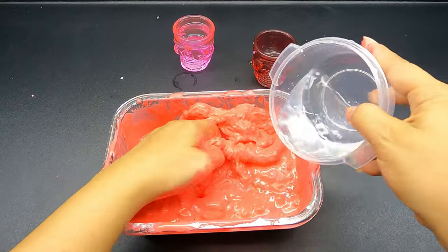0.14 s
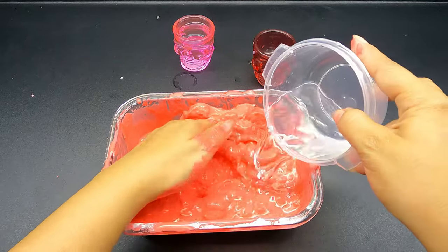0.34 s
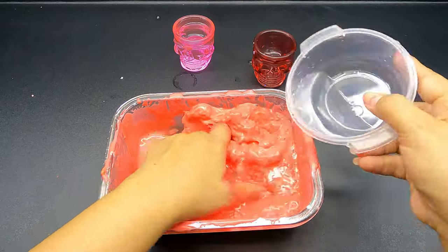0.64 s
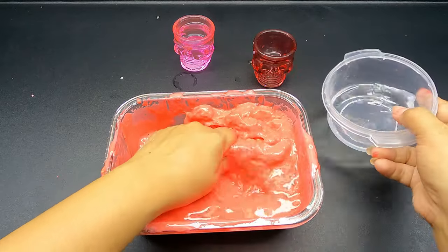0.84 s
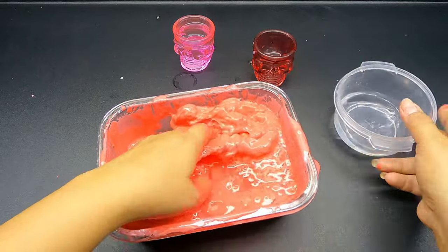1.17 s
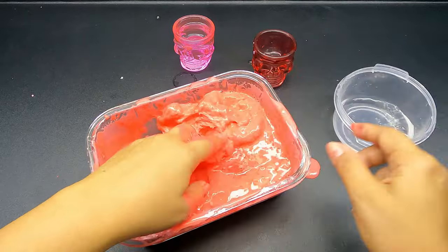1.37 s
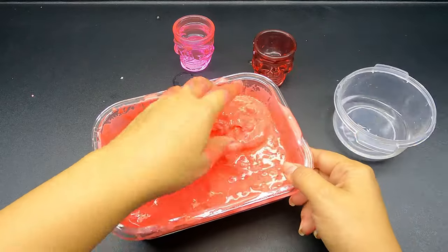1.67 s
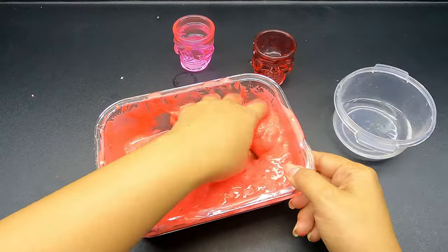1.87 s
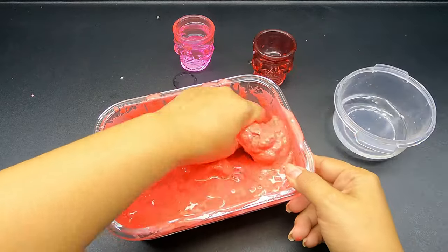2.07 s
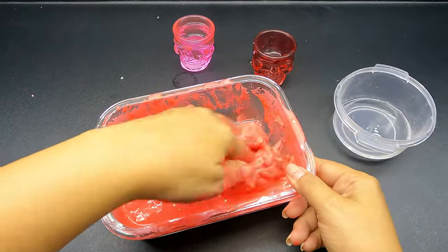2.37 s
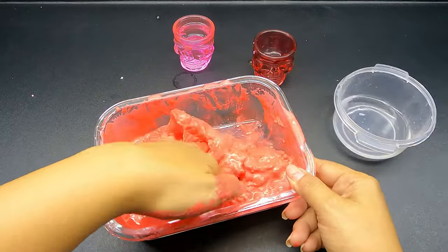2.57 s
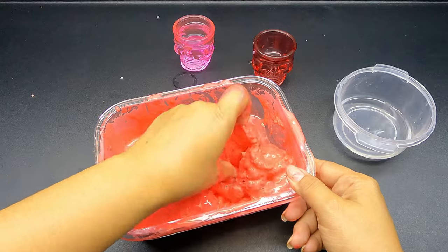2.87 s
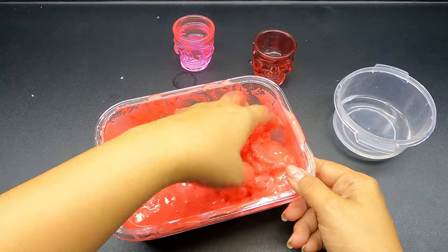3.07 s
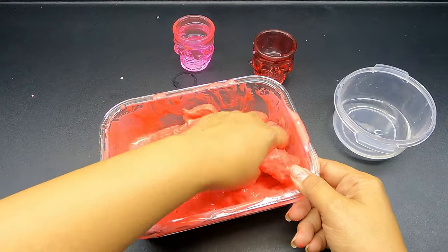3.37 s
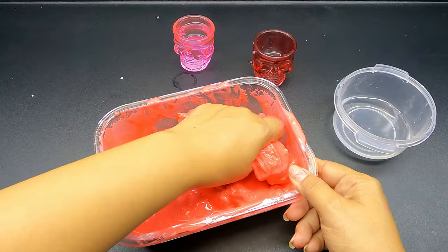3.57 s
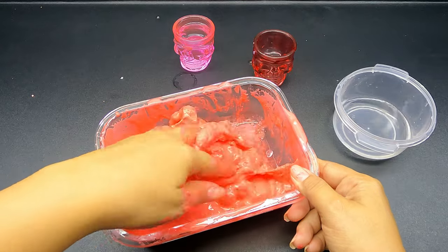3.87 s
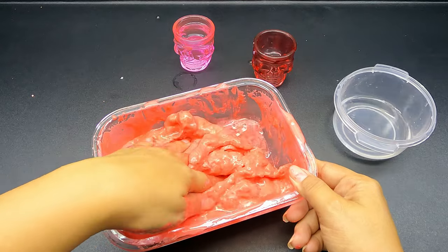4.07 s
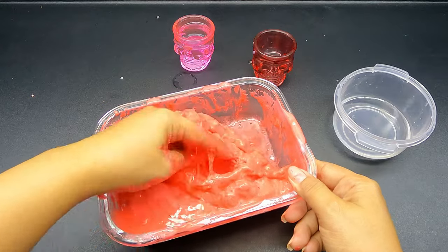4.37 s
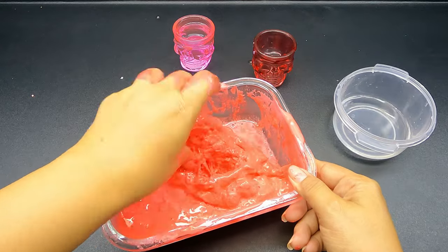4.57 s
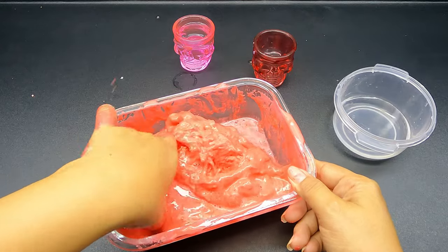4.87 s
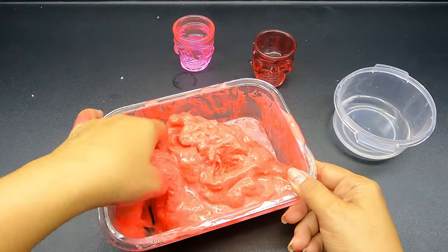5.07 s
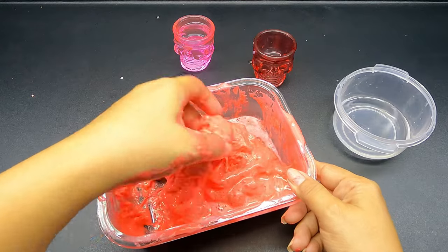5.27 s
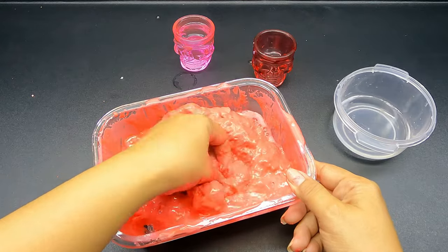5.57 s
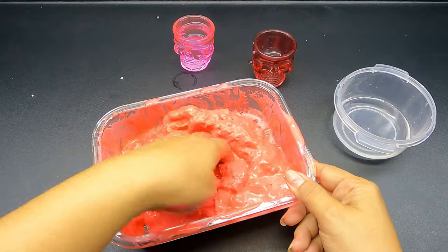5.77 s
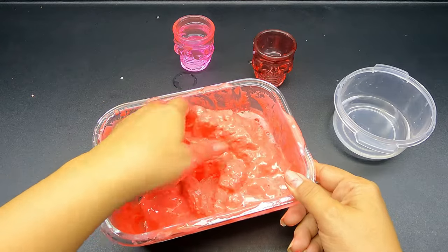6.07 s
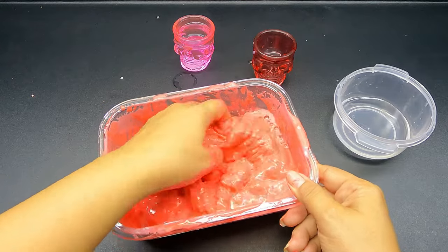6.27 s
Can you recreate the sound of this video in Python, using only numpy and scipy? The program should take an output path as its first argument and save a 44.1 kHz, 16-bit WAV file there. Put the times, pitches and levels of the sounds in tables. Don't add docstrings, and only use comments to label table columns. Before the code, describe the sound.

Close-up slime squeezing: crisp snapping bubbles in irregular clusters over faint wet crackle, with low hollow thuds as the light tub knocks the tabletop.

```python
import sys
import numpy as np
from scipy import signal
from scipy.fft import rfft, irfft, next_fast_len
from scipy.io import wavfile
from scipy.ndimage import uniform_filter1d, map_coordinates

SR = 44100
rng = np.random.default_rng(int(sys.argv[2]) if len(sys.argv) > 2 else 0)


def nominal_scale(level):
    x = np.asarray(level, float) / 20
    return 10 ** x


def output_pcm(signal):
    pcm = np.clip(np.atleast_2d(signal).T, -1, 1) * 32767
    wavfile.write(sys.argv[1], SR, np.round(pcm).astype(np.int16))


N = 283563

# time in s, cavity level in dB, snap level in dB,
# snap centre in Hz.
PAIRS = [(0.1525, -39, -42, 4030), (0.944, -40, -44.5, 4840), (1.0447, -38, -44, 4100),
         (1.975, -47, -43.5, 5470), (2.6322, -46, -44.5, 3660), (2.699, -40, -41.5, 3700),
         (2.777, -42, -41, 4250), (3.076, -47.5, -39.5, 4200), (3.168, -41.5, -44, 6100),
         (3.324, -49, -41, 4800), (3.5005, -44, -42, 5900), (3.544, -37.5, -50, 4920),
         (3.551, -44, -35.5, 5600), (4.0137, -46, -36.5, 3970), (4.404, -41.5, -46.5, 2860),
         (4.456, -52, -31, 3300), (4.611, -38.5, -31.5, 6800), (5.1963, -51, -49.5, 5300),
         (5.5496, -55, -39.5, 2780), (5.627, -47, -45, 5740), (5.7429, -51, -42, 7000),
         (6.343, -44, -41, 7400), (1.633, -63, -39, 5260), (2.67, -47, -51, 6500),
         (2.865, -47, -47.5, 3350), (4.315, -60, -50, 7000), (4.345, -56, -48, 5500),
         (5.464, -58, -51, 3240), (3.399, -57, -38, 5200)]
# frequency in Hz, level in dB, t60 in s.
LEG_MODES = [(47.34, -3, 0.76)]
TABLE_TOP_MODES = [(101.2, -16, 0.78), (131, 0, 0.17), (144.5, -4.5, 0.68), (336.3, -7.5, 0.17),
                   (403.3, -10.5, 0.24)]
DISH_BASE_MODES = [(183, -0.5, 0.096), (214.9, 1.5, 0.35), (242.4, 2, 0.19)]
DISH_WALL_MODES = [(486, 29.5, 0.034), (584, 13, 0.21), (688, 8.5, 0.33), (848, 7.5, 0.22), (928, 2.5, 0.2),
                   (993, 1, 0.15), (1013, 12, 0.13), (1140, 7, 0.34), (1190, 4.5, 0.24), (1370, -5, 0.12),
                   (1520, -5, 0.083), (1720, -3, 0.15)]


def pops():
    # frequency in Hz, level in dB.
    mic_tone = [(300, 10), (750, 2), (1100, 5), (7500, -3), (10200, -8), (12000, -8.5), (16000, -33)]

    def tone_and_echo(hz):
        echo = 0.18 * np.exp(-2j * np.pi * hz * 0.0034)
        return nominal_scale(along(mic_tone, hz)) * (1 + echo)

    pop = filtered(air_pockets() + film_snaps(), tone_and_echo)
    walls = ring(DISH_WALL_MODES, np.arange(SR // 4) / SR, 0)
    walls = walls / np.abs(rfft(walls)).max()
    return pop + nominal_scale(-18) * signal.fftconvolve(pop.mean(0), walls)[:N]


def air_pockets():
    # time of the middle in s, peak in dB, cavity in Hz, length in ms.
    loud_pockets = [(0.9185, -34.5, 1960, 1.17), (0.9704, -31, 1800, 2), (0.9792, -24, 1640, 1.7),
                    (0.9972, -29.5, 1720.0, 1.4), (1.17, -25, 1770, 0.68), (1.2175, -26, 1300, 1.6),
                    (1.2953, -33, 1590, 3.1), (1.365, -33, 1600.0, 2.1), (1.3883, -20, 1240, 2.7),
                    (1.4097, -31, 1760, 2.76), (1.433, -27, 1400, 1.9), (1.5231, -28, 1720, 0.92),
                    (2.141, -29.5, 1620.0, 1.63), (2.1803, -32.0, 1360, 1.4), (2.1897, -14.5, 1660, 1.18),
                    (2.1962, -41, 1520.0, 0.92), (2.3336, -14.5, 1040, 2.74), (2.3378, -14.5, 990, 3.1),
                    (2.3444, -25, 1060, 2.9), (2.35, -25.0, 1100, 2.6), (2.3624, -26, 1210, 3),
                    (2.371, -26.5, 1170, 3.6), (2.5458, -29.5, 1874, 1.02), (2.9398, -33.5, 1420, 1.5),
                    (3.4142, -27.5, 1710, 2.3), (3.4205, -32, 1540, 5.5), (3.5021, -28.5, 1610, 3.6),
                    (3.6, -27.5, 1550, 3.3), (3.6057, -34, 1510, 4.2), (3.613, -26.5, 1600, 3),
                    (3.764, -41, 1520, 1.2), (3.7958, -20.5, 1770, 1.26), (3.7993, -26, 1220, 2.44),
                    (4.1294, -28, 2100, 0.98), (4.4574, -22, 1770.0, 0.35), (4.4971, -18, 1800, 0.97),
                    (4.4995, -22.5, 1270, 1.14), (4.937, -33.5, 1140.0, 1.7), (5.2305, -25.5, 1200, 2.2),
                    (5.2348, -21, 1010, 2.14), (5.242, -27, 1060, 1.35), (5.6525, -35, 1480, 2.24),
                    (5.808, -28, 1500.0, 2.3), (5.8941, -26, 1370.0, 2.26), (5.937, -24.5, 1900.0, 1.2),
                    (5.94, -21, 1580, 0.83), (5.9715, -22, 1550.0, 0.95), (5.976, -17.5, 1400, 1.24),
                    (5.9782, -19, 1190, 1.47), (5.99, -40, 1570.0, 0.6)]
    # time in s, peak in dB, cavity in Hz.
    small_pockets = [(0.1815, -38, 1620), (0.822, -34.5, 1630), (0.951, -34, 1460.0), (0.9731, -34, 1550),
                     (0.9775, -40.0, 1780.0), (0.9943, -40.0, 1480), (1.0246, -37, 2090.0),
                     (1.0348, -39, 1770), (1.176, -35, 1720.0), (1.1921, -34, 1700), (1.2246, -45, 1280.0),
                     (1.292, -33, 1310.0), (1.298, -39, 1740.0), (1.3102, -45, 1440),
                     (1.3307, -35.0, 1840.0), (1.3347, -35, 1520.0), (1.337, -33, 1840.0),
                     (1.3506, -30, 1360), (1.3963, -36, 1310), (1.398, -32, 1740), (1.413, -30, 1800),
                     (1.4172, -39, 1530.0), (1.4235, -37, 1610), (1.4296, -42, 1340.0), (1.5613, -48, 1820),
                     (2.1215, -37, 1650.0), (2.1835, -32, 1190.0), (2.315, -38, 1640), (2.5242, -38, 1490.0),
                     (2.5725, -36.5, 1340), (2.9326, -38.5, 1540.0), (3.416, -28, 1900), (3.4906, -35, 1870),
                     (3.508, -35, 1610), (3.5214, -42, 1830.0), (3.5387, -36, 1920.0), (3.546, -44, 1730.0),
                     (3.5529, -36, 1820.0), (3.5598, -37, 1580.0), (3.5646, -33, 1690.0),
                     (3.6179, -45, 1570.0), (3.6235, -37, 1530), (3.8046, -40, 1860), (3.8645, -34, 1350),
                     (4.028, -35, 1290), (4.4443, -31, 1500.0), (4.4482, -32.5, 1300), (4.467, -31, 2320),
                     (4.4938, -42, 1760), (4.503, -31.5, 1250), (4.546, -37, 2100), (4.901, -37, 1960),
                     (4.941, -39, 1430), (4.9437, -48, 1050), (5.8906, -35, 1800.0), (5.8974, -39, 1630.0),
                     (5.943, -35, 1610.0), (5.948, -41, 1570.0), (6.3058, -36.5, 1390),
                     (0.198, -45, 1520), (0.224, -39, 1820), (0.402, -55.5, 1390), (0.5285, -52.5, 1950),
                     (0.7414, -39.5, 1400), (0.9063, -39, 1640.0), (0.9207, -43, 1590.0),
                     (1.109, -40.5, 1630.0), (1.1226, -39, 1500.0), (1.5278, -49, 1460),
                     (1.564, -40.5, 1510.0), (1.9842, -37, 1890), (2.2543, -37, 1390), (2.4658, -41, 1450),
                     (2.5618, -41, 1430.0), (2.637, -40, 1320), (2.9229, -34, 1320), (3.083, -37, 1320),
                     (3.3685, -38.5, 1650), (3.7895, -34, 1450), (3.891, -38, 1970), (4.0777, -40, 1260.0),
                     (4.082, -42, 1420), (4.1288, -37, 1520), (4.461, -36, 1340), (4.6178, -43, 1350),
                     (4.8277, -45.5, 1180), (4.8305, -53, 2150), (4.864, -41, 1280), (4.866, -48, 2140),
                     (5.5541, -40, 1230), (6.3591, -35.5, 1750),
                     (1.792, -46.5, 1200),
        (3.403, -41, 1550),
        (3.444, -39, 1150),
        (3.584, -43, 1300),
        (5.837, -54, 1400),
        (5.863, -43, 1360),
        (2.267, -48, 1500),
    ]
    # start in s, level in dB, centre in Hz, length in ms.
    leaks = [
        (5.655, -65, 5600, 50),
        (5.812, -55, 7400, 63),
        (5.978, -48.5, 4630, 71),
    ]
    small_ms, paired_ms, paired_hz, pitch_scatter = 1.514, 2.58, 1575, 0.1
    sputter_db = -16.5

    pockets = [tuple(row) for row in loud_pockets]
    pockets += [(*row, small_ms) for row in small_pockets]
    sputter = [(s - ms / 2000, db + sputter_db, hz, 2 * ms) for s, db, hz, ms in pockets]
    pitch = paired_hz * np.exp(pitch_scatter * rng.standard_normal(len(PAIRS)))
    paired = [(s, db, hz, paired_ms) for (s, db, _, _), hz in zip(PAIRS, pitch)]

    tones = bubbles(pockets, swell=4.4, fade=3.94, glide=0.015, lean_db=0.95)
    wet = bursts(sputter + paired, q=1.19, broad_db=-27.5, grain_db=-0.5, rise=0.093, tail=13.5, sag_db=4.0)
    seep = bursts(leaks, q=4.2, broad_db=-10, grain_db=-1.0, rise=0.0454, tail=19, sag_db=1.5, size=8192)
    return tones + wet + seep


def film_snaps():
    # time in s, level in dB, centre in Hz, length in ms.
    loud_snaps = [(0.1701, -31.5, 7500, 1.5), (0.1796, -25, 7600, 0.81), (0.1978, -31.5, 4770, 1.37),
                  (0.2375, -31, 4670, 1.83), (0.8156, -28.5, 7850, 0.97), (1.1913, -30.5, 5240, 2.4),
                  (1.2906, -35, 3640, 5.5), (1.3632, -25.5, 3800, 1.65), (1.3859, -23, 6140, 3.8),
                  (1.4076, -30.5, 3080, 4.2), (1.5205, -27.5, 3600, 1.28), (1.5595, -25.5, 8050, 3.2),
                  (2.3841, -33.5, 7860, 5.3), (2.9386, -24.5, 6260, 1.9), (3.6011, -31.5, 7460, 7.2),
                  (3.7632, -25, 7240, 2.8), (3.7956, -21.5, 5500, 2.06), (3.8869, -36.5, 7760, 7.5),
                  (4.1266, -25.5, 4650, 1.8), (4.4427, -31.5, 7100, 4), (4.4968, -24.5, 3030, 1.74),
                  (4.6025, -36, 5620, 0.73), (5.6514, -30, 7000, 1.56), (5.8073, -36, 3500, 2.6),
                  (5.8934, -21.5, 10000, 3.3), (5.939, -17, 4550, 4.2), (5.9714, -16.5, 3840, 0.97),
                  (5.9747, -12.5, 4370, 0.65), (5.9909, -23, 3500, 1.38)]
    # time in s, level in dB, centre in Hz.
    faint_snaps = [(0.0515, -47, 3950), (0.1238, -41.5, 9100), (0.555, -50, 5950), (0.5883, -47.5, 6840),
                   (0.716, -45, 7900), (0.771, -44.5, 5500), (0.9686, -33.5, 3640), (1.0336, -41, 5430),
                   (1.1438, -43.5, 6640), (1.1693, -36, 3300), (1.2527, -37.5, 5800), (1.331, -38, 3100),
                   (1.35, -34, 4120), (2.3383, -31.5, 7500), (2.396, -34, 8600), (3.4696, -39, 3300),
                   (3.519, -34, 6700), (3.5384, -42, 5800), (3.757, -34, 7360), (4.0018, -40.5, 3930),
                   (4.067, -44.5, 6500), (4.546, -35, 6800), (5.0897, -44.5, 5430), (5.3, -40.5, 5500),
                   (5.3118, -38.5, 5560), (5.5, -45.5, 4200), (5.559, -39.5, 5300), (5.8826, -37, 9500)]
    ticks = [(0.1331, -45, 8200), (0.6543, -42, 5760), (0.6994, -50, 7410.0), (0.7114, -54.0, 6070.0),
             (0.7388, -38, 6900), (0.793, -37.5, 4540.0), (0.907, -45, 5090.0), (0.9648, -36.5, 5740),
             (1.0003, -47, 3340.0), (1.1218, -43, 5070.0), (1.1344, -49, 7080.0), (1.2159, -41.0, 4630.0),
             (1.913, -49, 6030), (1.969, -41, 5620.0), (2.0867, -51, 4690.0), (2.1892, -39, 8000),
             (2.441, -37, 6700), (2.578, -46, 5220.0), (2.7087, -44, 4860), (3.0167, -39, 7250),
             (3.2815, -51, 6790.0), (3.3513, -45, 5350.0), (3.3663, -44, 4960.0), (3.5067, -35, 6040.0),
             (3.5453, -41, 5420.0), (3.9788, -42, 5820.0), (4.0812, -41, 5380.0), (4.0872, -43, 4800.0),
             (4.3064, -52, 5690.0), (4.3194, -51, 5790.0), (4.5449, -36, 6500.0), (4.602, -38, 5570.0),
             (4.8617, -43.5, 7200), (5.305, -37, 3850), (5.5703, -46, 5180.0), (6.3411, -32, 7350)]
    # time in s, level in dB, pitch in Hz, length in ms.
    tuned_snaps = [
        (2.1893, -25, 4180, 1.3),
        (5.8073, -26, 7400, 2.3),
        (5.6514, -29, 5700, 1.4),
        (5.9909, -21, 5160, 1.54),
        (3.812, -40, 4750, 12),
    ]
    skin_ms, tick_ms = 2.493, 0.71

    paired = [(s, db, hz) for s, _, db, hz in PAIRS]
    skins = [(*row, skin_ms) for row in faint_snaps + paired]
    skins += [(*row, tick_ms) for row in ticks]
    tearing = bursts(loud_snaps + skins, q=1.1, broad_db=-8.0, grain_db=3, rise=0.85, tail=13.9, bend=0.87)
    ringing = bursts(tuned_snaps, q=3.3, broad_db=-23.5, grain_db=1.0, rise=0.295, tail=12.5)
    return tearing + ringing


def bubbles(table, swell, fade, glide, lean_db):
    s, db, hz, ms = (c[:, None] for c in np.transpose(table))
    lead = 256
    t = (np.arange(1024) - lead) / SR
    u = t * 1000 / ms
    luck = rng.standard_normal((len(s), 2))
    shape = 2 / (np.exp(np.minimum(-swell * u, 50)) + np.exp(np.minimum(fade * u, 50)))
    opening = 1 + glide * np.tanh(u / 2) / 2
    rows = nominal_scale(db) * shape * np.sin(2 * np.pi * hz * t * opening + np.pi * luck[:, :1])
    lean = nominal_scale(lean_db * luck[:, 1:])
    start = s[:, 0] - lead / SR
    return np.array([placed(start, rows * lean), placed(start, rows / lean)])


def bursts(table, q, broad_db, grain_db, rise, tail, sag_db=0, bend=2, size=1024):
    s, db, hz, ms = (c[:, None] for c in np.transpose(table))
    u = np.arange(size) / SR * 1000 / ms
    grains = rng.standard_normal((len(s), size)) * nominal_scale(grain_db * rng.standard_normal((len(s), size)))
    luck = rng.standard_normal((len(s), 2))
    shape = np.minimum(u / rise, 1) ** bend
    shape = shape * nominal_scale(-tail * np.maximum(u - 0.9, 0)) * nominal_scale(-sag_db * u)

    f = np.fft.rfftfreq(2 * size, 1 / SR)
    width = hz / (q * nominal_scale(1.5 * luck[:, :1]))
    resonance = 1j * f * width / (hz ** 2 - f ** 2 + 1j * f * width)
    bass_cut = (1j * f / (900 + 1j * f)) ** 2
    mouth = (resonance ** 2 + nominal_scale(broad_db)) * bass_cut
    rows = irfft(rfft(grains * shape, 2 * size) * mouth)[:, :size]
    rows *= nominal_scale(db) * np.sqrt(ms * SR / 1000) / np.linalg.norm(rows, axis=1, keepdims=True)

    lean = nominal_scale(1.1 * luck[:, 1:])
    start = (s - 0.5 * rise * ms / 1000)[:, 0]
    return np.array([placed(start, rows * lean), placed(start, rows / lean)])


def rim_flicks():
    # time in s, level in dB.
    flicks = [
        (2.334, -23.5),
        (5.232, -30),
        (5.9745, -25.5),
    ]
    # frequency in Hz, level in dB, t60 in s.
    rim_modes = [(685, -2, 0.28), (930, -2.5, 0.26), (1020, -5, 0.26), (1188, 2, 0.29)]
    t = np.arange(SR // 2) / SR
    rows = [nominal_scale(db) * ring(rim_modes, t, 1.5) for _, db in flicks]
    return placed(np.array(flicks)[:, 0], np.array(rows))


def slime():
    # start in s, length in s, squelch in dB, fizz in dB.
    squeezes = [(0.163, 0.094, -55.5, -57), (0.538, 0.045, -61.5, -71.5), (0.735, 0.19, -56.5, -59),
                (0.915, 0.15, -53, -69), (1.177, 0.26, -41.5, -52.5), (1.522, 0.098, -55, -49),
                (1.917, 0.24, -56.5, -62.5), (2.265, 0.14, -52.5, -53.5), (2.355, 0.12, -56, -59.5),
                (2.537, 0.072, -51.5, -66), (2.858, 0.24, -55, -56), (3.387, 0.27, -51, -57),
                (3.743, 0.16, -57, -50), (3.988, 0.25, -56, -64), (4.397, 0.27, -57, -57),
                (4.87, 0.098, -59, -61.5), (5.201, 0.14, -51.5, -62), (5.503, 0.12, -60.5, -63),
                (5.807, 0.24, -58.5, -63), (5.953, 0.081, -74, -54), (6.275, 0.3, -51.5, -63)]
    # frequency in Hz, level in dB per Hz.
    squelch_tone = [(500, 1.5), (850, -22.5), (1050, 6), (1300, 3.5), (1700, -22), (2300, -3), (3300, -14),
                    (5000, -48)]
    fizz_tone = [(1500, 10.5), (3000, 3.5), (4800, 10.5), (7500, 6.5), (9500, 3), (10500, -5.5),
                 (12500, 1.5), (16400, -44)]
    hiss_tone = [(290, -39), (500, -10), (853, -9.5), (1210, -16), (3470, -22), (5190, -14.5),
                 (7560, -13.5), (11300, -26), (15800, -39)]
    rest_squelch_db, rest_fizz_db, hiss_db = -67.5, -76.5, -75
    ease_db_per_s = 239

    start, length, squelch_db, fizz_db = np.transpose(squeezes)
    squelch = crackle(squelch_tone, centre_hz=1500, count=2600, cycles=4.45, size_db=4.0,
                      scatter=0.246, smooth=0.91, patchy_db=4.0)
    squelch = squelch * nominal_scale(2.1 * wobble(30))
    squelch = squelch * effort(start, length, squelch_db, rest_squelch_db, ease_db_per_s)
    fizz = crackle(fizz_tone, centre_hz=5500, count=5000, cycles=2.05, size_db=5.0,
                   scatter=0.482, smooth=0.89, patchy_db=3.0, size=128)
    fizz = fizz * nominal_scale(3.2 * wobble(43))
    fizz = fizz * effort(start, length, fizz_db, rest_fizz_db, ease_db_per_s)
    noise = rng.standard_normal((2, N))
    hiss = unit(spread(filtered(noise, lambda hz: nominal_scale(along(hiss_tone, hz)))))
    return squelch + fizz + nominal_scale(hiss_db + 3.4 * wobble(6.2)) * hiss


def crackle(spectrum, centre_hz, count, cycles, size_db, scatter, smooth, patchy_db, size=360):
    t = np.arange(size) / SR
    pair = []
    for capsule in range(2):
        luck = rng.standard_normal((count, 2))
        start = rng.random(count) * (N / SR)
        hz = np.clip(centre_hz * np.exp(scatter * luck[:, :1]), 1050, 12000)
        u = hz * t / cycles
        level = nominal_scale(size_db * np.minimum(luck[:, 1:], 2))
        rows = level * u ** 2 * np.exp(-3 * u) * np.sin(2 * np.pi * hz * t)
        noise = filtered(rng.standard_normal(N), lambda f: nominal_scale(along(spectrum, f)))
        pair.append(unit(placed(start, rows)) + smooth * unit(noise))
    z = signal.stft(np.array(pair), nperseg=256)[2]
    field = uniform_filter1d(rng.standard_normal(z.shape[1:]), size=7, axis=0)
    field = uniform_filter1d(field, size=14, axis=1)
    clumped = signal.istft(z * nominal_scale(patchy_db * unit(field)), nperseg=256)[1]
    return unit(spread(clumped[:, :N]))


def bumps():
    # time in s, table top in dB, dish base in dB, dish walls in dB.
    blows = [(0.156, -35, -28.5, -76), (0.407, -35.5, -60, -76), (1.168, -20, -18, -39),
             (1.29, -23, -20, -30), (1.409, -21, -23, -27), (1.432, -45, -16, -32.5),
             (2.013, -24, -23.5, -51), (2.3334, -14, -6, -19), (2.57, -51, -60, -45.5),
             (2.635, -55, -60, -48), (2.926, -30.5, -29, -49.5), (4.074, -34.5, -33.5, -57),
             (4.461, -33, -31, -39), (4.86, -33, -26.5, -43.5), (4.9357, -6, -11.5, -23.5),
             (5.229, -18, -18, -20.5), (5.899, -32, -28.5, -54), (5.973, -44, -57, -40.5),
             (6.163, -33, -36, -66), (6.373, -23, -22, -30.5)]
    # frequency in Hz, level in dB per Hz.
    rattle_tone = [(250, 9.5), (400, 9.5), (700, 5.5), (1100, -16), (1600, -9.5), (2500, -21), (5000, -82),
                   (16000, -97)]
    legs_db = -18.5

    t = np.arange(SR // 2) / SR
    rows, rattle = [], []
    for _, top_db, base_db, wall_db in blows:
        leg_db = (top_db + base_db) / 2 + legs_db
        soft_db = min(wall_db - top_db + 16, 0) / 2
        top_modes = [(hz, db + soft_db * (hz > 300), t60) for hz, db, t60 in TABLE_TOP_MODES]
        low = nominal_scale(leg_db) * ring(LEG_MODES, t, 0)
        low = low + nominal_scale(top_db) * ring(top_modes, t, 1.05)
        low = low + nominal_scale(base_db) * ring(DISH_BASE_MODES, t, 2.0)
        walls = nominal_scale(wall_db + 1.5) * ring(DISH_WALL_MODES, t, 1.8)
        rows.append(low * (1 - np.exp(-t / 0.009)) + walls * (1 - np.exp(-t / 0.0018)))
        rattle.append(nominal_scale(wall_db - 60 * t / 0.24) * rng.standard_normal(len(t)))
    start = np.array(blows)[:, 0]
    loose = filtered(placed(start, np.array(rattle)), lambda hz: nominal_scale(along(rattle_tone, hz)))
    return placed(start, np.array(rows)) + nominal_scale(2.5) * loose


def slides():
    # start in s, length in s, level in dB.
    strokes = [(0.16, 0.19, -51.5), (1.213, 0.22, -35), (1.698, 0.17, -56), (2.004, 0.15, -46.5),
               (2.323, 0.079, -36.5), (3.245, 0.41, -56), (4.066, 0.14, -53.5), (4.27, 0.095, -58),
               (4.435, 0.095, -44.5), (5.01, 0.032, -42), (5.239, 0.057, -36.5), (5.502, 0.063, -51.5),
               (5.849, 0.12, -47), (6.208, 0.26, -43.5)]
    rest_db, coast_db_per_s = -60, 106.5
    t = np.arange(SR // 2) / SR
    body = 0.22 * ring(LEG_MODES, t, 0) + ring(TABLE_TOP_MODES, t, 0)
    body = body + 1.18 * ring(DISH_BASE_MODES, t, 0) + 0.2 * ring(DISH_WALL_MODES, t, 0)
    friction = effort(*np.transpose(strokes), rest_db, coast_db_per_s) * nominal_scale(1.3 * wobble(25))
    shake = rng.standard_normal((2, N)) * friction
    return spread(signal.fftconvolve(shake, body[None] / np.linalg.norm(body), axes=1)[:, :N])


def effort(start, length, level_db, rest_db, fall_db):
    press_s = 0.031
    coarse = np.arange(N)[::64]
    t = coarse / SR - start[:, None]
    db = level_db[:, None] + np.minimum(t, 0) * 20 / press_s
    db = db - fall_db * np.maximum(t - length[:, None], 0)
    total = np.sqrt(nominal_scale(2 * rest_db) + nominal_scale(2 * db).sum(0))
    return np.interp(np.arange(N), coarse, total)


def room(x):
    # frequency in Hz, t60 in s.
    decay = [(300, 0.62), (1200, 0.28), (4000, 0.29), (12000, 0.16)]
    out = np.zeros((2, N + SR))
    step, delay = SR // 5, 130
    for at in range(0, N, step):
        hz, t, z = signal.stft(rng.standard_normal((2, SR // 3)), SR, nperseg=256)
        fading = z * nominal_scale(-60 * t / along(decay, hz)[:, None])
        tail = signal.istft(fading, SR, nperseg=256)[1]
        wet = signal.fftconvolve(x[None, at:at + step], tail / np.linalg.norm(tail[0]), axes=1)
        out[:, at + delay:at + delay + wet.shape[1]] += wet
    return spread(out[:, :N])


def ring(modes, t, scatter_db):
    x = 0
    for hz, db, t60 in modes:
        x = x + nominal_scale(db + scatter_db * rng.standard_normal() - 60 * t / t60) * np.sin(2 * np.pi * hz * t)
    return x / np.max(np.abs(x))


def spread(pair):
    # frequency in Hz, left-right likeness from 0 to 1.
    likeness = [(100, 1), (500, 0.62), (2000, 0.6), (8000, 0.7), (13000, 0.21)]

    def mid_and_side(hz):
        turn = np.arccos(np.clip(along(likeness, hz), -1, 1)) / 2
        return np.array([np.cos(turn), np.sin(turn)])

    mid, side = filtered(pair, mid_and_side)
    return np.array([mid + side, mid - side])


def placed(start_s, rows):
    at = np.round(start_s * SR).astype(int)[:, None] + np.arange(rows.shape[1])
    return np.bincount(at.ravel(), rows.ravel(), N + SR)[:N]


def wobble(rate):
    knots = rng.standard_normal(int(N * rate / SR) + 4)
    return map_coordinates(knots, [np.arange(N) * rate / SR])


def filtered(x, response):
    m = next_fast_len(N + SR)
    return irfft(rfft(x, m) * response(np.fft.rfftfreq(m, 1 / SR)), m)[..., :N]


def along(points, hz):
    f, v = np.transpose(points)
    return np.interp(np.log(hz + 1), np.log(f + 1), v)


def unit(x):
    return x / np.sqrt(np.mean(x ** 2) + 1e-20)


def scene():
    pop = pops()
    bump = bumps()
    answer = room(nominal_scale(-11.5) * pop.mean(0) + nominal_scale(-18) * bump)
    return pop + rim_flicks() + slime() + bump + slides() + answer


def band_limit(x):
    return signal.sosfilt(signal.butter(12, 16470, fs=SR, output="sos"), x)


def record(dry):
    # frequency in Hz, left minus right in dB.
    balance = [(100, 1), (3000, 1.4), (8000, .3), (14000, -5.5)]
    lag_s, bass_hz, top_hz = -1.2e-5, 38, 15950

    def capsules(hz):
        left = nominal_scale(along(balance, hz) / 2) * np.exp(-1j * np.pi * hz * lag_s)
        band = (hz < top_hz) / (1 + (bass_hz / (hz + 1)) ** 8)
        return np.array([left, 1 / left]) * band

    return band_limit(filtered(dry, capsules))


dry = scene()
out = record(dry)
output_pcm(out)
```